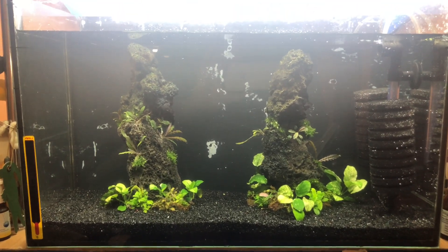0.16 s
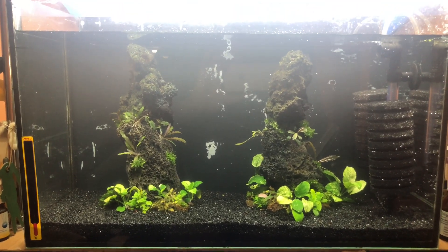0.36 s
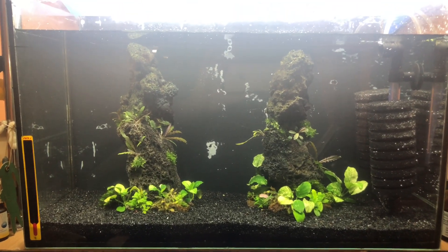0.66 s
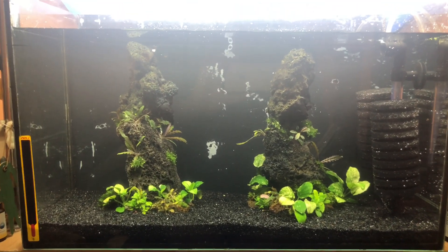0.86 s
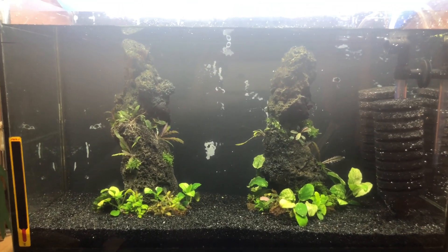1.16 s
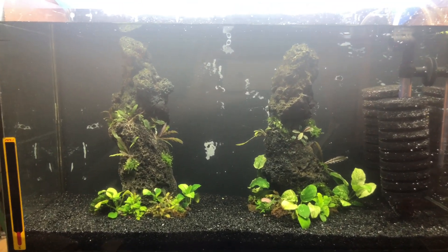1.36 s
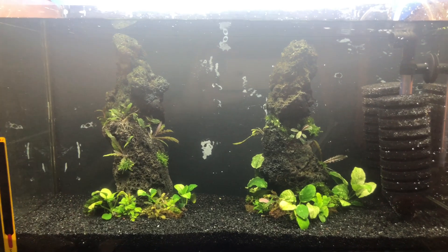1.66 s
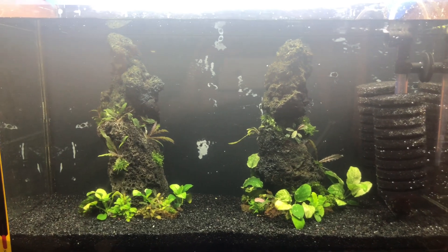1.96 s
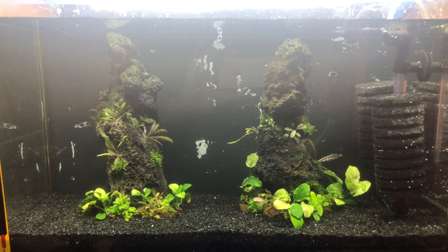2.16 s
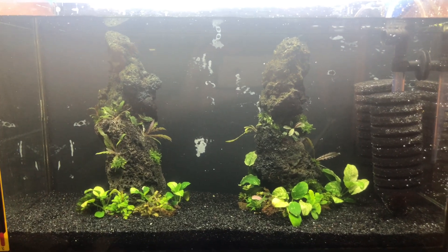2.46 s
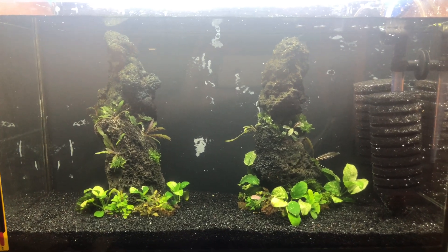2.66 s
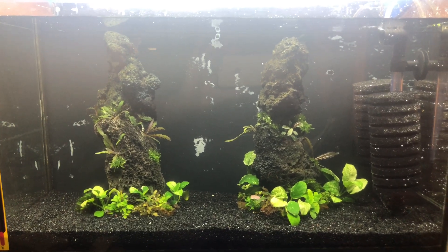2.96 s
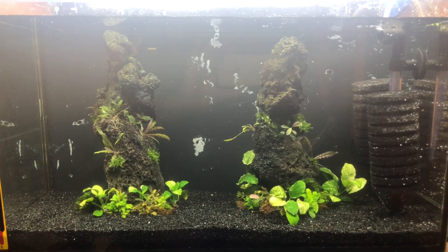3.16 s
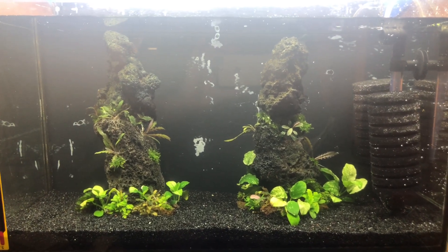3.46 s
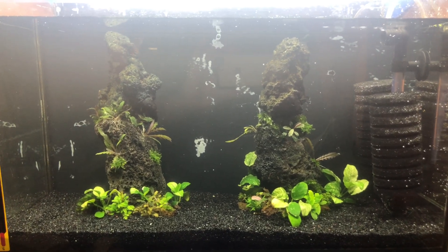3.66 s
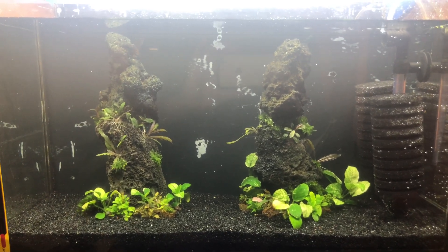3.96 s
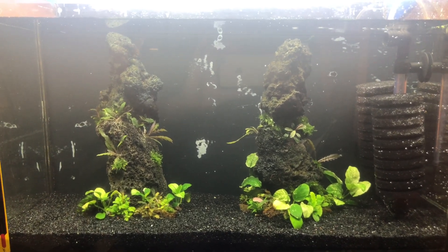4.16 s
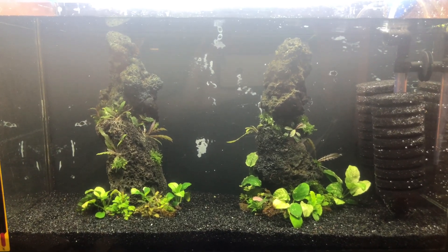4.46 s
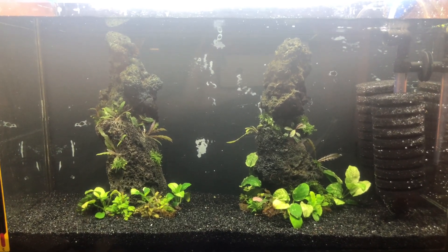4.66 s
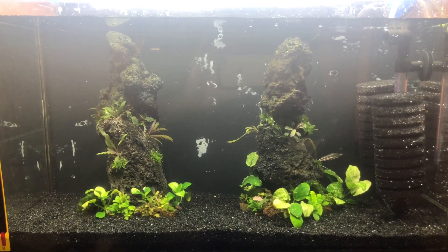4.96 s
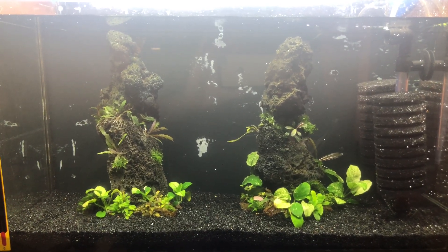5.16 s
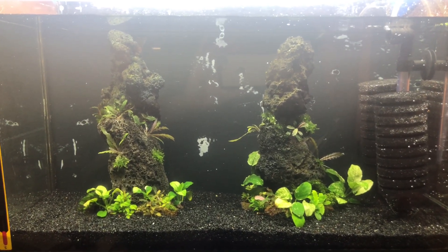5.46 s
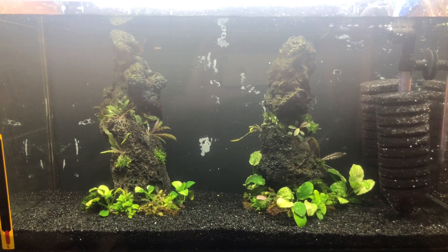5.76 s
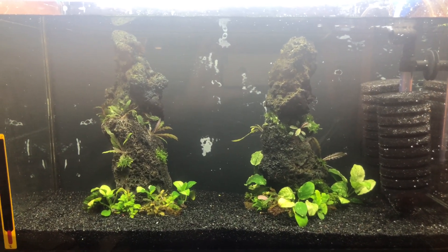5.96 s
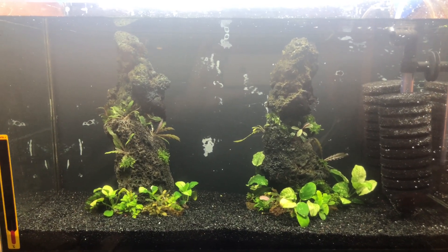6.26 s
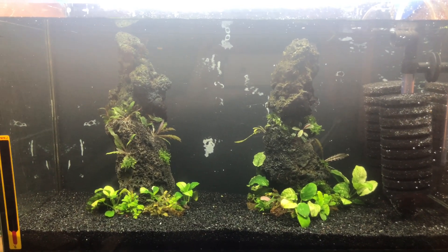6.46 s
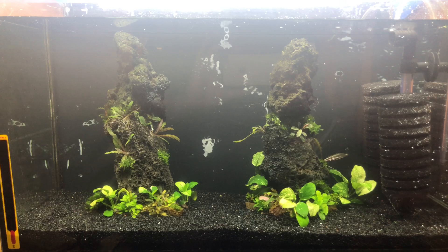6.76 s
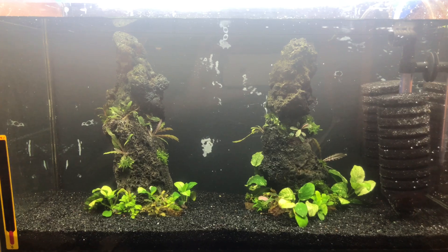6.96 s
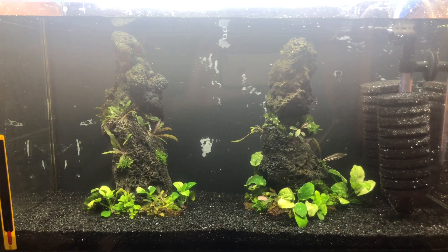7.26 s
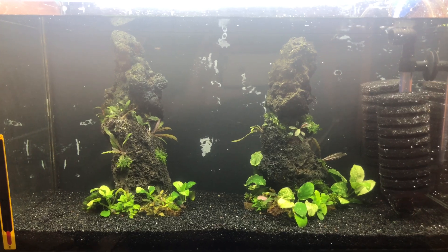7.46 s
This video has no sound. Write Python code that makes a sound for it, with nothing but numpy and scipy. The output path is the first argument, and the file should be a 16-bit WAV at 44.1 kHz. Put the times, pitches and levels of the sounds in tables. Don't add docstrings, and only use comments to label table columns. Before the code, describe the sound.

Throughout about 7.6 seconds, an aquarium air pump buzzes steadily in a quiet room, a 50 Hz mains drone with strong low-mid overtones and a rough, reedy edge from alternating hard and soft strokes. A filter motor hums weakly below, beating slowly with it; fine airy fizz and soft room murmur stay behind. At 0.15 s the camera case snaps and knocks at the microphone, followed until about 0.6 s by low finger thuds and a short rub. Tiny high bubble ticks come irregularly, clearest near 1.3 and 2.7 s, with rounder pops at 0.55 and 3.2 s. Faint creaks and a light rub occur around 2.0-2.9 s, more between 4.1 and 4.6, then a cluster at 5.1-5.75. Low bumps mark 6.1 and 7.14 s, the latter beside a rapid faint string of five bubbles. The buzz's overtones shift subtly as the microphone drifts, and the drone continues to the end.

```python
import sys
import numpy as np
from scipy import signal
from scipy.fft import rfft, irfft, next_fast_len
from scipy.io import wavfile
from scipy.ndimage import uniform_filter1d

SR = 44100
rng = np.random.default_rng(int(sys.argv[2]) if len(sys.argv) > 2 else 0)


def master_out(mix):
    frames = np.transpose(np.atleast_2d(mix))
    ceiling = np.clip(frames, -1, 1)
    pcm = np.round(ceiling * 32767).astype(np.int16)
    wavfile.write(sys.argv[1], SR, pcm)


def to_linear_factor(level_db):
    exponent = np.asarray(level_db, float) / 20
    return 10 ** exponent


N = 335601

# time in seconds, frequency in Hz.
MAINS_HZ = [(0, 50.014), (7.61, 50.001)]
BUZZ_DB = [-61.5, -67, -59, -56.4, -55.8, -56.7, -61.4, -57.5, -68.7, -75.5, -69, -67.2, -69.3, -68.8,
           -77.7, -76.7, -80, -90, -69.8, -66.4, -76.4, -82.7, -78.5, -75.5, -84.5, -77.6, -81.2, -76.7,
           -76.7, -75.4, -74.5, -73.8, -79.5, -84, -77.5, -78.8, -77.5, -80.5, -82, -91, -89, -96, -85, -90,
           -85, -89, -88, -96, -93, -90, -90, -95, -93, -88, -100, -94, -91, -101, -98, -100, -87]
# frequency in Hz, level in dB.
RATTLE_TREND = [(3000, -91.5), (4200, -100.5), (6500, -99)]
CABINET_MULTIPLES = [11, 15, 17, 29]
LID_MULTIPLES = [28, 30]
# time in seconds, distance from its first place in cm.
CAMERA_DRIFT = [(0, -0.5), (.95, -0.3), (1.55, 2.5), (2.1, 3), (2.7, 3), (5.3, 6), (5.65, 8), (6.1, 9),
                (7.6, 9)]
CREST_MULTIPLES = (15, 17)
# first multiple, last multiple, share left in the node (0-1), crest level in dB.
NODE_MULTIPLES = [
    (21, 26, 0, 1),
    (32, 35, 0.4, .8),
]
# start in seconds, peak in dB, pitch in Hz, spray in dB.
SMALL_BUBBLES = [(0.2228, -52, 13200, -5), (0.9696, -49.5, 13100, -7), (1.283, -42.5, 8950, -9),
                 (1.7912, -54, 13900, -5), (2.0197, -53, 13900, -6), (2.5126, -64, 14000, -6),
                 (2.7135, -44.5, 11340, -12), (2.8438, -63, 13900, -6), (2.8947, -56, 13800, -1),
                 (3.8301, -50.5, 11000, -9), (4.3105, -58, 13100, -6), (4.3179, -59, 12000, -4),
                 (4.3549, -59, 13500, -6), (4.5066, -58, 10950, -3), (4.7789, -71, 8600, -6),
                 (4.8932, -56, 12600, -6), (4.9114, -59, 11600, -6), (5.5866, -64, 14100, -6),
                 (5.9677, -64, 8550, -11), (6.0311, -50, 13100, -8), (6.6612, -48, 14200, -2),
                 (7.0418, -57, 15200, -4), (7.4638, -61, 13400, -6), (7.509, -55, 13700, -7)]
# start in seconds, peak in dB, pitch in Hz, spray in dB.
BIG_BUBBLES = [
    (.545, -53, 5050, -8),
    (3.196, -55.5, 6700, -4.5),
]
# time in seconds, knock in dB, boom in dB.
CASE_CREAKS = [(0.152, -38, -43), (1.44, -65, -56), (2.158, -56, -61.0), (2.185, -54, -64),
               (2.657, -61, -64.0), (2.881, -47.5, -59), (2.901, -53, -60), (2.918, -50, -66),
               (4.081, -55, -51), (4.509, -47, -61.0), (4.569, -50, -65), (4.595, -65, -67.0),
               (5.107, -52, -65), (5.27, -52, -62.0), (5.363, -50, -56), (5.383, -43, -62),
               (5.423, -43, -54), (5.652, -53, -64), (5.748, -45, -55), (6.117, -53, -45),
               (6.323, -48.5, -61.0), (7.141, -45, -44), (7.476, -50, -61.0)]
# time in seconds, thud in dB.
FINGER_THUDS = [(0.284, -47), (.313, -58), (.352, -41), (0.375, -55), (.4, -55), (0.449, -54), (.5, -59),
                (.55, -58), (.66, -62), (2.25, -62), (4.52, -61), (5.704, -58), (6.0, -55)]
# start in seconds, length in seconds, level in dB.
FINGER_RUBS = [
    (0.327, 0.22, -55.5),
    (2.03, .05, -66),
    (2.25, .17, -64),
]
# frequency in Hz, level in dB.
KNOCK_COLOUR = [(40, -120), (150, -25), (330, -8), (480, -1), (660, 7.5), (780, -5), (900, -9), (1150, -9),
                (2000, -43), (4000, -120)]
BOOM_COLOUR = [(5, -120), (25, -40), (60, 11), (95, 1.5), (160, -5), (240, -17), (400, -36), (1000, -120)]
THUD_COLOUR = [(5, -120), (25, -35), (60, -15), (110, 9), (200, 2), (330, -7), (500, -61), (1200, -120)]
SNAP_COLOUR = [(300, -120), (600, -40), (1150, 2), (1350, -9), (1600, 17), (1950, -10), (2400, 1),
               (3000, -23), (3600, -7), (4300, -11), (7000, -11), (11500, -20), (13000, -32), (15500, -44)]
RUB_COLOUR = [(5, -120), (20, -38), (33, 0), (65, 1), (95, -12), (130, -1), (200, -2.5), (320, -9.5),
              (450, -32), (1000, -120)]
# frequency in Hz, density in dB per Hz.
FIZZ_SPECTRUM = [(1500, -125), (2800, -112), (4200, -105), (6500, -107.5), (7600, -113.5), (8700, -111.5),
                 (10000, -118), (13500, -119), (15700, -124)]
# frequency in Hz, density in dB per Hz.
ROOM_SPECTRUM = [(14, -102), (26, -88.5), (38, -86), (66, -89.5), (150, -94.5), (380, -93), (460, -97),
                 (680, -96), (820, -99.5), (1100, -95), (1400, -104), (2700, -108), (5000, -125)]

STROKE_START_S = 0.1705
SOUND_CM_PER_S = 34300


def along(points, hz):
    point_hz, value = np.transpose(points)
    return np.interp(np.log(hz + 1), np.log(point_hz + 1), value)


def curves(rows):
    s, *columns = np.transpose(rows)
    return [np.interp(np.arange(N) / SR, s, column) for column in columns]


def wobble(rate):
    knots = rng.standard_normal(200 * N // SR)
    return np.interp(np.arange(N) * min(rate, 150) / SR, np.arange(knots.size), knots)


def filtered(x, response):
    size = next_fast_len(len(x) + 8192)
    spectrum = rfft(x, size) * response(np.fft.rfftfreq(size, 1 / SR))
    return irfft(spectrum, size)[:len(x)]


def rush(spectrum, patchy_db):
    z = signal.stft(rng.standard_normal(N), nperseg=512)[2]
    patches = uniform_filter1d(rng.standard_normal(z.shape), size=5, axis=0)
    patches = uniform_filter1d(patches, size=6, axis=1)
    noise = signal.istft(z * to_linear_factor(patchy_db * patches / patches.std()), nperseg=512)[1][:N]
    return filtered(noise / noise.std(), lambda hz: to_linear_factor(along(spectrum, hz)) * np.sqrt(SR / 2))


def mains_cycles():
    return STROKE_START_S + np.cumsum(curves(MAINS_HZ)[0]) / SR


def pump():
    cm, = curves(CAMERA_DRIFT)
    cycle = mains_cycles() + 0.0011 * (0.5 * wobble(3) + 0.67 * wobble(40))
    order = np.arange(1, 131)
    level = along(RATTLE_TREND, 50 * order) + 4 * rng.standard_normal(order.size)
    level[:len(BUZZ_DB)] = BUZZ_DB
    lag = 1.35 * (order >= 8) + 0.14 * np.maximum(order - 16, 0)
    lag[:2] = np.pi
    lag += np.where(order % 2, -1.1 * (order > 18), 0.55 * (order < 8))
    lag += 1.1 * np.isin(order, LID_MULTIPLES) - 2.8 * np.isin(order, CABINET_MULTIPLES)
    lag += np.clip(order / 12 - 3, 0, 2) * rng.standard_normal(order.size)
    out = np.zeros(N)
    for k, db, late in zip(order, level, lag):
        sway_db = np.clip(0.02 * k, 0.15, 1.3) * wobble(0.96)
        gain = np.sqrt(2) * to_linear_factor(db + sway_db) * standing_wave(k, cm)
        out += gain * np.cos(2 * np.pi * k * cycle - late)
    return out


def standing_wave(k, cm):
    if CREST_MULTIPLES[0] <= k <= CREST_MULTIPLES[1]:
        return to_linear_factor(4 - 0.8 * cm)
    for first, last, leak, crest_db in NODE_MULTIPLES:
        if first <= k <= last:
            waves = k * MAINS_HZ[0][1] * cm / SOUND_CM_PER_S
            return to_linear_factor(crest_db) * np.hypot(np.sin(2 * np.pi * waves), leak)
    return 1


def motor():
    slip_hz, beat_top_s, motor_db = 0.87, 3.92, -73
    cycle = mains_cycles() - slip_hz * (np.arange(N) / SR - beat_top_s)
    return -np.sqrt(2) * to_linear_factor(motor_db) * np.cos(2 * np.pi * cycle)


def bubble_string():
    start_s, gap_s, first_db, loss_db = 7.155, 0.0088, -61, 1.1
    first_hz, rise_hz, spray_db = 8150, 140, -14
    return [(start_s + k * gap_s, first_db - k * loss_db, first_hz + k * rise_hz, spray_db) for k in range(5)]


def bubbles():
    out = np.zeros(N + SR)
    t = np.arange(SR // 8) / SR
    rise = 1 - np.exp(-(t / 0.00096) ** 2)
    for s, db, hz, spray_db in SMALL_BUBBLES + BIG_BUBBLES + bubble_string():
        def near(f, share):
            return 1j * f * share * hz / (hz * hz - f * f + 1j * f * share * hz)

        def wide(f):
            bass_loss = np.sqrt(1 + (min(0.9 * hz, 8200) / (f + 1)) ** 16)
            return near(f, 0.71) ** 2 / bass_loss / (1 + (f / 15500) ** 8)

        ring = rise * to_linear_factor(-60 * t / 0.014) * np.sin(2 * np.pi * hz * t)
        spray = filtered(rise * to_linear_factor(-60 * t / 0.032) * rng.standard_normal(t.size), wide)
        walls = to_linear_factor(-60 * t / 0.094) * (1 - np.exp(-t / 0.0021)) * rng.standard_normal(t.size)
        echo = filtered(walls, lambda f: near(f, 0.037)) + to_linear_factor(-13) * filtered(walls, wide)
        burst = ring + to_linear_factor(spray_db + 4.5) * spray + to_linear_factor(-4.5) * echo
        out[round(s * SR):][:t.size] += to_linear_factor(db + 0.5) * burst
    return out[:N]


def bending(colour, echo_s, echo_db):
    blow = np.zeros(SR // 8)
    blow[SR // 100] = 1
    blow[SR // 100 + round(echo_s * SR)] = to_linear_factor(echo_db)
    wave = filtered(blow, lambda hz: to_linear_factor(along(colour, hz)) * np.exp(-2j * np.pi * 1.6 * hz ** 0.3 + 2j))
    return wave / np.abs(wave).max()


def handling():
    out = np.zeros(N + SR)
    boom = bending(BOOM_COLOUR, 0.01, -12)
    thud = bending(THUD_COLOUR, 0.0076, -22)
    snap = bending(SNAP_COLOUR, 0.00083, -1)
    lead_s = 0.0127
    rebounds = rng.random((len(CASE_CREAKS), 2))
    for (s, knock_db, boom_db), (late, weak) in zip(CASE_CREAKS, rebounds):
        knock = bending(KNOCK_COLOUR, 0.00276 + 0.0026 * late, -9 - 6 * weak)
        creak = to_linear_factor(knock_db + 0.5) * knock + to_linear_factor(boom_db - 6) * boom
        out[round((s - lead_s) * SR):][:creak.size] += creak
    for s, db in FINGER_THUDS:
        out[round((s - lead_s) * SR):][:thud.size] += to_linear_factor(db) * thud
    snap_s = CASE_CREAKS[0][0] - lead_s - 0.0017
    out[round(snap_s * SR):][:snap.size] += to_linear_factor(-43) * snap
    rub = rush(RUB_COLOUR, patchy_db=3.5)
    return out[:N] + dragging() * rub / rub.std()


def dragging():
    attack_db_per_s, release_db_per_s, rest_db = 485, 90, -77
    t = np.arange(N) / SR
    level = np.full(N, to_linear_factor(rest_db))
    for s, length, db in FINGER_RUBS:
        before, after = np.maximum(s - t, 0), np.maximum(t - s - length, 0)
        level += to_linear_factor(db - attack_db_per_s * before - release_db_per_s * after)
    return level


def fizz():
    return to_linear_factor(0.16 * wobble(6.9)) * rush(FIZZ_SPECTRUM, patchy_db=0.9)


def room_air():
    return to_linear_factor(0.8 * wobble(2)) * rush(ROOM_SPECTRUM, patchy_db=1.5)


def scene():
    return (pump() + motor() + bubbles() + handling() + fizz() + room_air())[None]


def low_pass(x):
    return signal.sosfilt(signal.butter(12, 15790, fs=SR, output="sos"), x)


def record(dry):
    mix = filtered(dry[0], lambda hz: hz < 15760)[None]
    return low_pass(mix)


dry = scene()
out = record(dry)
master_out(out)
```